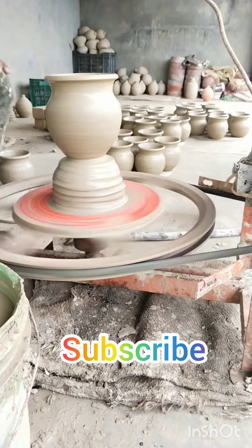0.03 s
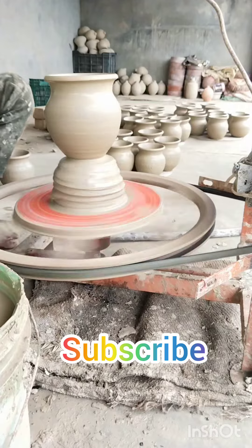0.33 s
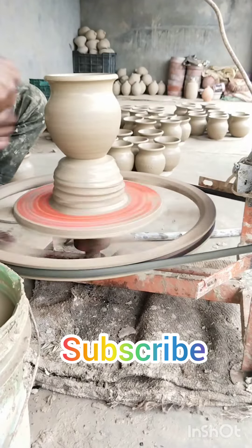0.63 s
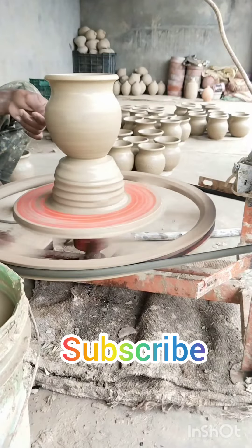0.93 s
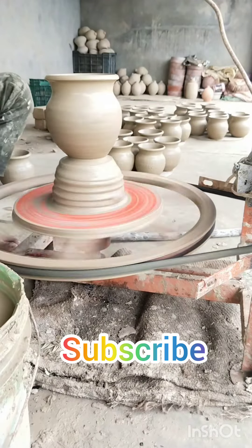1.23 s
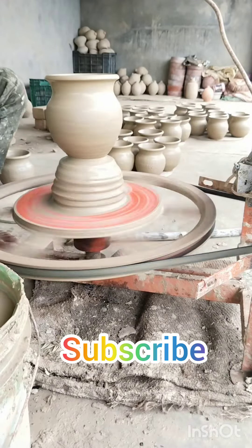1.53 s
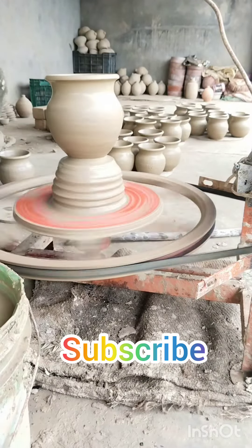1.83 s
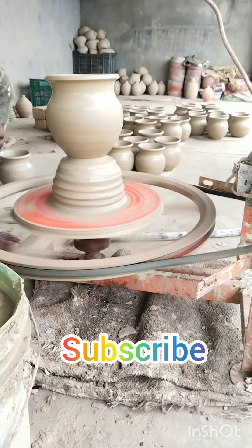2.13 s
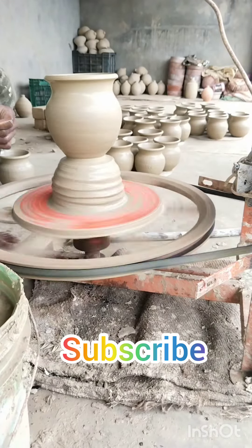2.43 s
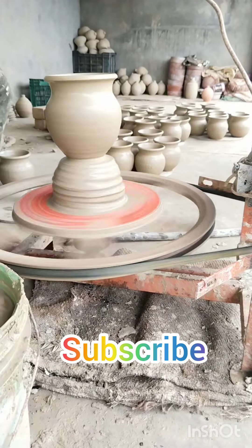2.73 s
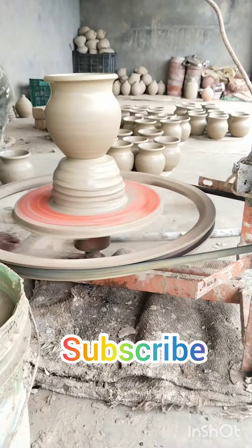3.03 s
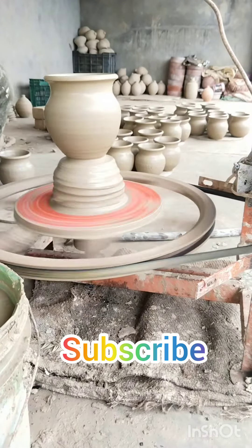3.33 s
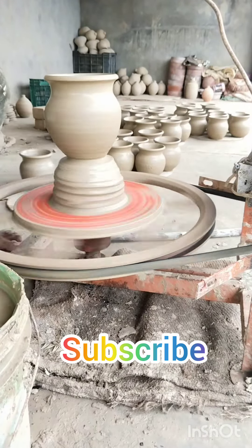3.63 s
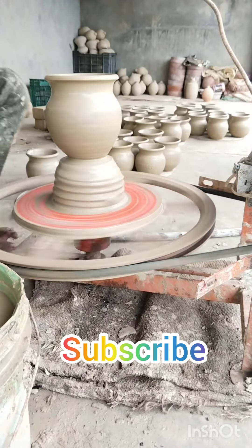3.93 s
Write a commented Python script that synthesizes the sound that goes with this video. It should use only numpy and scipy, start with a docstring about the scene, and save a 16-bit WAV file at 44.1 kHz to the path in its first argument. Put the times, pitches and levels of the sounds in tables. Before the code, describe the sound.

Low, uneven rumble of a spinning pottery wheel with metallic chatter, clacks and faint chirps.

```python
"""A motor-driven pottery wheel spins in a small workshop. From the start the heavy wheel rumbles in
uneven surges over a faint motor hum, hiss and whine; its metal frame rings with bursts of chatter and
hard clacks, and thin falling chirps, probably small birds, come in runs. At 0.4 s there is a short
hollow scrape. Then the wheel starts to thump unevenly, hardest around 2.6 s. Near the end something
swishes briefly on the left."""
import sys
import numpy as np
from scipy import signal
from scipy.fft import rfft, irfft
from scipy.io import wavfile
from scipy.ndimage import uniform_filter1d

SR = 44100
rng = np.random.default_rng(int(sys.argv[2]) if len(sys.argv) > 2 else 0)


def master_out(mix):
    """Clip the mix to full scale and print it as 16-bit PCM to the path in sys.argv[1]."""
    frames = np.transpose(np.atleast_2d(mix))
    ceiling = np.clip(frames, -1, 1)
    pcm = np.round(ceiling * 32767).astype(np.int16)
    wavfile.write(sys.argv[1], SR, pcm)


N = 176400
T = np.arange(N) / SR
SIDES = np.array([[1], [-1]])  # left, right


def from_db(db):
    """Decibels to gain."""
    return 10 ** (np.asarray(db) / 20)


def rms_one(x):
    """Scale to rms 1."""
    return x / np.sqrt(np.mean(x ** 2) + 1e-20)


def drift(rate_hz):
    """Smooth random motion of spread 1."""
    pole = np.exp(-2 * np.pi * rate_hz / SR)
    return rms_one(signal.lfilter([1], [1, -2 * pole, pole * pole], rng.standard_normal(2 * N))[N:])


def colour(x, curve):
    """Shape a signal with an EQ curve of (Hz, dB) points; rms 1."""
    hz, db = np.transpose(curve)
    bins_hz = np.maximum(np.fft.rfftfreq(N, 1 / SR), 1)
    gains = from_db(np.interp(np.log(bins_hz), np.log(hz), db))
    return rms_one(irfft(rfft(x) * gains, N))


def butter(x, order, hz, kind):
    """Butterworth filter."""
    return signal.sosfilt(signal.butter(order, hz, kind, fs=SR, output="sos"), x)


def stereo_noise(correlation):
    """White noise with a given left-right correlation."""
    mid, side = rng.standard_normal((2, N))
    return np.sqrt((1 + correlation) / 2) * mid + np.sqrt((1 - correlation) / 2) * side * SIDES


def pan(db):
    """Constant-power gains; positive dB leans left."""
    return rms_one(from_db(db / 2 * SIDES))


def gate(start, length, attack_s, release_s):
    """Attack, hold and exponential release."""
    rise = np.clip((T - start) / attack_s + .5, 0, 1)
    return rise * np.exp(-np.clip(T - start - length, 0, .5) / release_s)


def workshop(x, t60_s=0.16):
    """Short reflections from the walls: eight feedback delays a side."""
    out = np.zeros((2, N))
    for k, lag in enumerate((rng.uniform(.007, 0.03, 16) * SR).astype(int)):
        loop, feedback = x[k % 2].copy(), from_db(-60 * lag / SR / t60_s)
        for i in range(lag, N, lag):
            loop[i:i + lag] += feedback * loop[i - lag:i][:N - i]
        out[k % 2] += (loop - x[k % 2]) * (-1) ** (k // 2)
    return out / 2


# EQ of the motor's running noise and of its hiss. Each row: frequency in Hz, relative level in dB.
RUNNING_EQ = [(150, 8), (500, -0.5), (720, 1.5), (1050, 6.5), (1400, -7), (2400, -9), (4000, -33)]
HISS_EQ = [(2500, -8), (5000, -1), (9600, -1.5), (13800, -9), (15500, -7)]
# The motor's whine. Each row: pitch in Hz, level in dB.
WHINE_TONES = [(6870, -71.5), (9510, -74.5), (11700, -76.5)]


def motor(hum_hz=99, whine_width_hz=70):
    """The bed: wavering mains hum and running noise, with thin hiss and a faint whine on the left."""
    hum = from_db(-52 + 2 * drift(4.7)) * np.sqrt(2) * np.sin(2 * np.pi * hum_hz * T + drift(4.0))
    running = from_db(-51.5) * pan(3.5) * colour(stereo_noise(0), RUNNING_EQ)
    hiss = from_db(-65 + drift(27)) * colour(stereo_noise(0.97), HISS_EQ)
    whine = 0
    for hz, db in WHINE_TONES:
        flutter = drift(whine_width_hz) + 1j * drift(whine_width_hz)
        whine += from_db(db) * (flutter * np.exp(2j * np.pi * hz * T)).real
    return hum + running + pan(21.5) * (hiss + whine)


def swish(peak_s=3.655, width_s=0.078):
    """A brief bright, grainy swish on the left."""
    swell = np.exp(-((T - peak_s) / width_s) ** 2)
    grain = from_db(-49.5 + 4.3 * drift(40))
    air = colour(stereo_noise(0.43), [(3000, -16), (6000, -16.5), (9000, -8.5), (15000, -10)])
    return swell * grain * pan(18) * air


# EQ of the scrape. Each row: frequency in Hz, relative level in dB.
SCRAPE_EQ = [(500, -13), (830, 20), (1050, -3), (2200, -61)]


def scrape(peak_s=0.413, width_s=0.03):
    """A short scrape: noise made hollow by one midrange peak."""
    swell = np.exp(-((T - peak_s) / width_s) ** 2)
    return from_db(-41) * swell * colour(stereo_noise(0.18), SCRAPE_EQ)


def rough_glides(calls, hz, length_s, octaves_per_s, width_hz):
    """Raspy tones that swell, fall in pitch and fade, each a little different."""
    out = np.zeros(N)
    rasp = drift(width_hz) + 1j * drift(width_hz)
    for (start, db), (detune, slope) in zip(calls, rng.standard_normal((len(calls), 2))):
        on = (T > start) & (T < start + length_s)
        age = T[on] - start
        pitch_hz = hz * 2 ** (.03 * detune - octaves_per_s * (1 + 0.199 * slope) * age)
        phase = 2 * np.pi * np.cumsum(pitch_hz) / SR
        swell = np.sqrt(np.abs(np.sin(np.pi * age / length_s)))
        out[on] += from_db(db) * swell * (rasp[on] * np.exp(1j * phase)).real
    return out


# Falling chirps. Each row: start in seconds, level of the lower tone in dB.
CHIRP_CUES = [(.053, -49), (0.297, -49), (.493, -52), (0.529, -45.5), (0.754, -53.5), (1.421, -48),
              (1.632, -49.5), (1.87, -49.5), (2.111, -48.5), (2.344, -52), (2.602, -57.5), (3.7, -47),
              (3.934, -50.5)]
# Soft whistles. Each entry: start in seconds.
WHISTLE_CUES = [.21, 1.34, 2.5, 3.55]


def birds():
    """Each chirp is a thin falling tone over a stronger, lower one just behind it; whistles in between."""
    upper = rough_glides([(start, db - 8) for start, db in CHIRP_CUES],
                         hz=6480, length_s=.065, octaves_per_s=8.3, width_hz=160)
    lower = rough_glides([(start + .008, db) for start, db in CHIRP_CUES],
                         hz=4850, length_s=.065, octaves_per_s=6.5, width_hz=330)
    whistles = rough_glides([(start, -53) for start in WHISTLE_CUES],
                            hz=3480, length_s=.07, octaves_per_s=.6, width_hz=90)
    calls = pan(9.7) * (upper + lower + whistles)
    return calls + from_db(-5) * workshop(calls)


# Bursts of chatter in the frame. Each row: start in seconds, length in seconds, drive level in dB.
CHATTER_CUES = [(0.086, 0.035, -40.5), (0.14, 0.031, -38), (0.392, 0.03, -36), (0.444, 0.041, -39),
                (0.524, 0.023, -37.5), (0.755, 0.017, -38.5), (0.877, 0.021, -36.5), (0.974, 0.036, -37.5),
                (1.111, 0.027, -37.5), (1.193, 0.026, -38), (1.253, 0.026, -37), (1.479, 0.013, -33.5),
                (1.568, 0.024, -37), (1.743, 0.024, -35), (1.792, 0.0084, -37), (1.837, 0.029, -38),
                (1.916, 0.015, -33.5), (2.13, 0.023, -40), (2.206, 0.022, -37.5), (2.234, 0.015, -35),
                (2.646, 0.037, -39), (3.16, 0.03, -36.5), (3.247, 0.039, -35), (3.436, 0.017, -36.5),
                (3.481, 0.019, -36), (3.577, 0.033, -40.5), (3.641, 0.026, -34.5), (3.689, 0.023, -39),
                (3.824, 0.025, -39.5), (3.879, 0.015, -37)]


def chatter_envelope(attack_s=.002, release_s=0.0067):
    """How hard the frame rattles: a restless floor, and bursts that each open with a firmer contact."""
    power = from_db(-47.5 + 2.8 * drift(16.3)) ** 2
    for start, length, db in CHATTER_CUES:
        burst = gate(start, length, attack_s, release_s)
        accent = gate(start, 0, attack_s, release_s)
        power += from_db(db) ** 2 * (burst ** 2 + accent ** 2)
    return np.sqrt(power)


def contacts(per_s=1000):
    """Dense random metal contacts, their sizes evened out over a few milliseconds."""
    hits = 1. * (rng.random(N) < per_s / SR)
    density = np.abs(uniform_filter1d(hits, size=400))
    return hits / np.sqrt(density + 1e-4)


# Hard single clacks. Each row: start in seconds, drive level of the buzz in dB.
CLACK_CUES = [(0.085, -24.5), (0.326, -32.5), (0.886, -26), (.957, -33.5), (1.082, -31), (1.197, -32.5),
              (1.323, -31.5), (1.584, -26), (1.795, -27), (2.238, -28.5), (2.38, -31.5), (2.58, -31.5),
              (2.705, -27.5), (2.852, -33), (3.025, -34), (3.135, -32), (3.344, -34.5), (3.59, -26),
              (3.737, -27.5), (3.75, -30.5)]


def clacks(strike_over_buzz_db=13, decay_s=0.0059):
    """Each clack is a clean strike, then a brief buzz; returns the strikes and the buzz envelope."""
    strikes, buzz = np.zeros((2, N))
    for start, db in CLACK_CUES:
        strikes[int(start * SR)] += from_db(db + strike_over_buzz_db)
        buzz += from_db(db) * (T >= start) * np.exp(-np.clip(T - start, 0, .5) / decay_s)
    return strikes, buzz


# EQ of the contacts' bright edge. Each row: frequency in Hz, relative level in dB.
TICK_EQ = [(4000, 3), (5500, -12), (6700, -2.5), (15500, -10)]


def ticks(envelope):
    """The crisp top of the metal contacts, far to the left."""
    edge = envelope * stereo_noise(0.96)
    return from_db(-18.5) * np.std(edge) * pan(23) * colour(edge, TICK_EQ)


# Resonances of the metal frame. Each row: centre in Hz, width in Hz, level in dB,
# left over right in dB, phase lead of the left side in radians.
FRAME_MODES = [(586, 134, -20, -0.5, -2), (791, 84, -20, 0, -0.5), (1020, 92, -10, 1, -1.7),
               (1151, 123, -12.5, 3, -2), (1652, 190, -9, -4.5, -1.43), (2140, 335, -10.5, -0.5, -1.16),
               (2300, 132, -9.5, 14, -0.8), (2488, 140, -9, -0.5, -1.66), (2905, 360, -9.5, 13, -1.5),
               (3107, 154, -9.5, 3, -0.04), (3410, 150, -13.5, 11.5, 0.2), (3844, 440, -13, 8, -0.6),
               (4790, 1650, -17, 9.5, 1.3)]


def frame(top_hz=5390, clack_db_per_octave=2):
    """Chatter and clacks ring the metal frame's resonances, with bright ticks on top."""
    rattle = chatter_envelope()
    chatter = rattle * contacts()
    strikes, buzz = clacks()
    body = 0
    for k, (hz, width, db, pan_db, lead) in enumerate(FRAME_MODES):
        tilt = from_db(clack_db_per_octave * np.log2(hz / 2500))
        drive = (chatter + tilt * buzz) * stereo_noise(0.75) + tilt * strikes * (-1) ** k
        ring = butter(drive + 1e-18, 2, [hz - width / 2, hz + width / 2], "band")
        spread = (signal.hilbert(ring) * np.exp(.5j * lead * SIDES)).real
        makeup = np.sqrt(SR / 2 / width)  # narrow bands pass less power
        body += from_db(db) * pan(pan_db) * makeup * spread
    return butter(body, 8, top_hz, "low") + ticks(rattle + buzz)


# EQ of the wheel's steady rumble. Each row: frequency in Hz, relative level in dB.
RUMBLE_EQ = [(20, -7.5), (55, 9.5), (120, 6.5), (280, -7), (1400, -92)]


def wheel_rumble():
    """The heavy wheel's constant low end, gently wavering."""
    return from_db(-41 + 2 * drift(5.4)) * colour(stereo_noise(0.28), RUMBLE_EQ)


# Surges of rumble. Each row: start in seconds, length in seconds, level in dB.
SURGE_CUES = [(0, 0.14, -33.5), (0.152, 0.055, -32), (0.305, 0.14, -35.5), (0.529, 0.11, -34.5),
              (0.794, 0.091, -32), (0.893, 0.13, -34), (1.087, 0.049, -32.5), (1.181, 0.097, -40),
              (1.601, 0.068, -42.5), (1.828, 0.099, -43.5), (2.246, 0.13, -38.5), (2.352, 0.091, -31),
              (2.457, 0.2, -33.5), (2.815, 0.043, -31), (3.032, 0.085, -34), (3.135, 0.18, -38),
              (3.54, 0.046, -36), (3.924, 0.13, -38.5)]


def wheel_surges(low_hz=85, top_hz=315.5):
    """The wheel's rumble swells unevenly: gated, fluttering low noise with a steep upper edge."""
    noise = butter(stereo_noise(0), 2, low_hz, "high")
    noise = butter(noise, 6, top_hz, "low") * from_db(4.2 * drift(18))
    out = 0
    for start, length, db in SURGE_CUES:
        shape = gate(start, length, attack_s=0.013, release_s=0.0037)
        out += from_db(db) * np.sqrt(np.mean(shape ** 2)) * rms_one(shape * noise)
    return out


# Thumps of the wheel. Each row: centre in seconds, peak level in dB, pitch in Hz.
THUMP_CUES = [(0.547, -21.5, 129), (0.562, -23, 200), (0.774, -19, 180), (0.871, -18, 277),
              (1.194, -25.5, 218), (1.507, -26.5, 124), (1.56, -28.5, 80), (1.779, -29, 115),
              (1.851, -24.5, 146), (2.074, -29, 85), (2.111, -24, 140), (2.268, -25, 102),
              (2.592, -19, 101), (2.623, -16.5, 103), (2.638, -20.5, 240), (3.424, -24, 141),
              (3.563, -25, 127), (3.956, -23.5, 86)]


def wheel_thumps(width_cycles=0.82):
    """The wheel thumps: a cycle or two of a low tone, slightly out of phase between the sides."""
    out = 0
    for (centre, db, hz), (phase, skew) in zip(THUMP_CUES, rng.standard_normal((len(THUMP_CUES), 2))):
        cycles = (T - centre) * hz
        phases = np.pi * phase + .5 * np.tanh(skew) * SIDES
        pulse = np.exp(-(cycles / width_cycles) ** 2)
        out += from_db(db) * pulse * np.cos(2 * np.pi * cycles + phases)
    return pan(2.6) * out


def scene():
    """The mix: the bright layers feed the room, while the wheel and motor stay dry."""
    bright = frame() + birds() + swish() + scrape()
    room = from_db(-9.5) * workshop(bright)
    wheel = wheel_rumble() + wheel_surges() + wheel_thumps()
    return bright + room + wheel + motor()


def record(dry):
    """A steep high cut at 15750 Hz."""
    return signal.sosfilt(signal.ellip(12, .1, 90, 15750, fs=SR, output="sos"), dry)


dry = scene()
out = record(dry)
master_out(out)
```